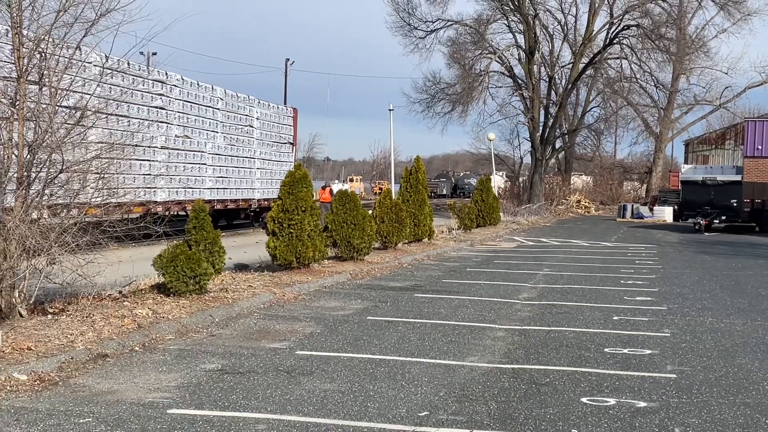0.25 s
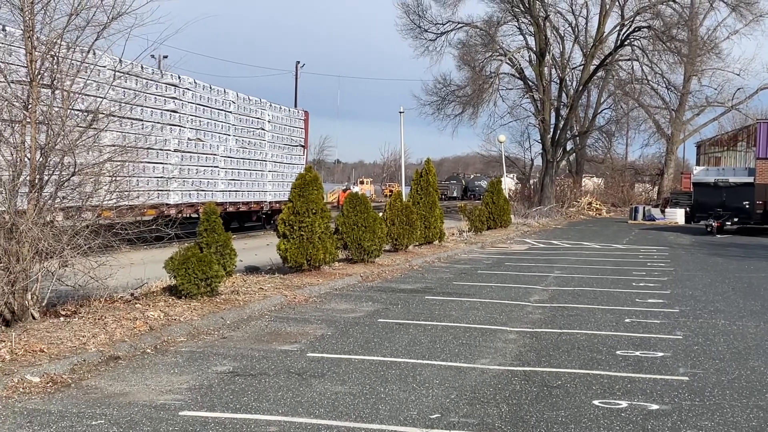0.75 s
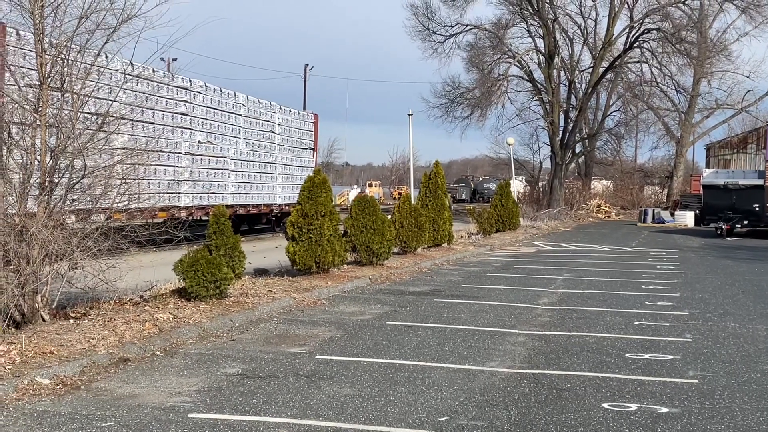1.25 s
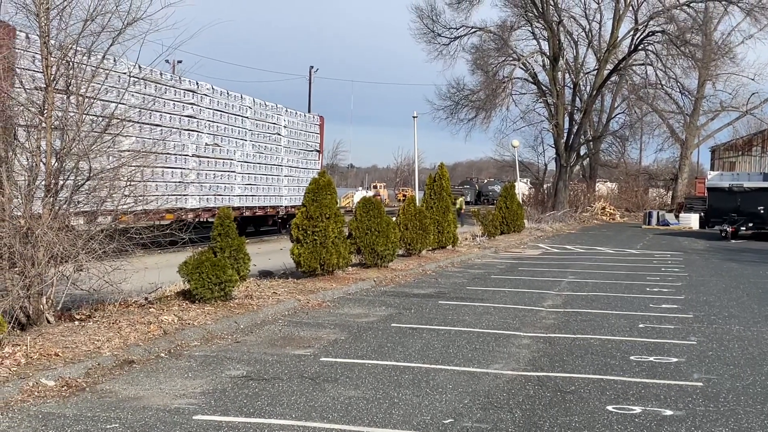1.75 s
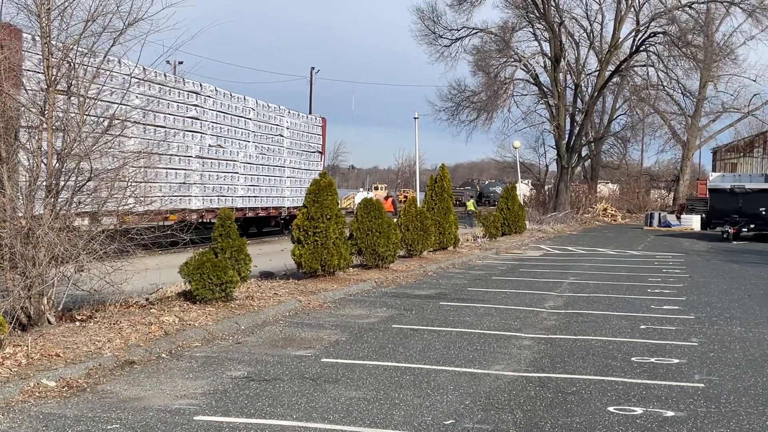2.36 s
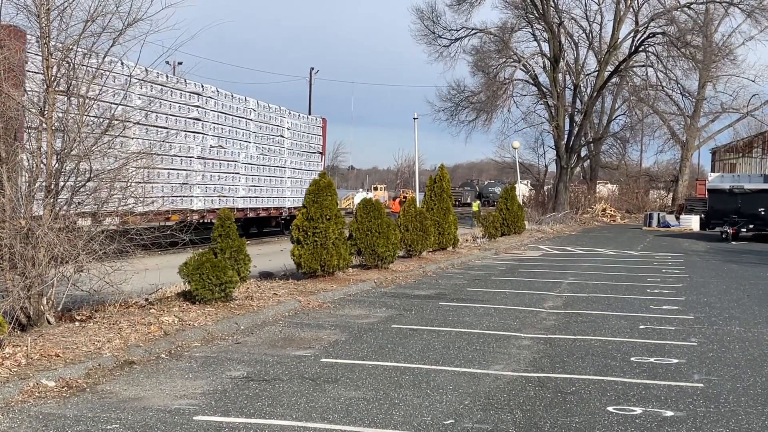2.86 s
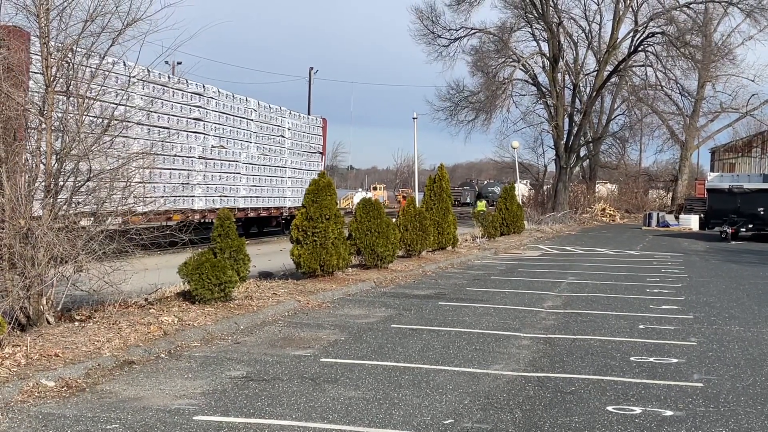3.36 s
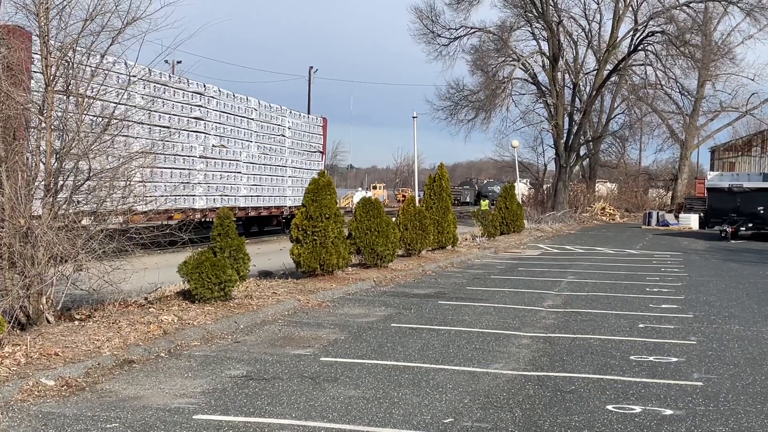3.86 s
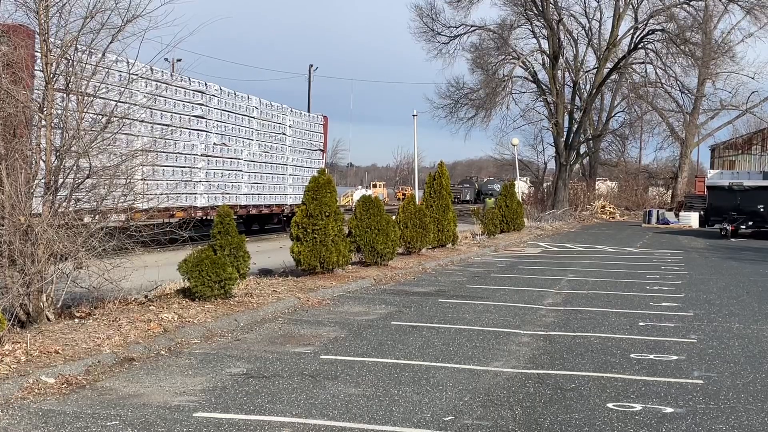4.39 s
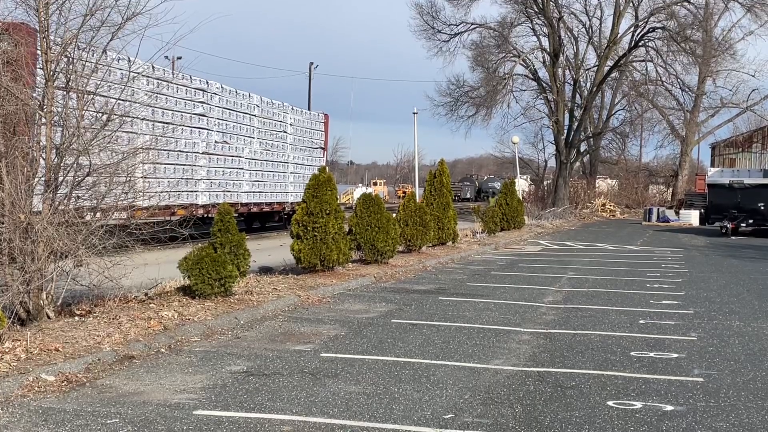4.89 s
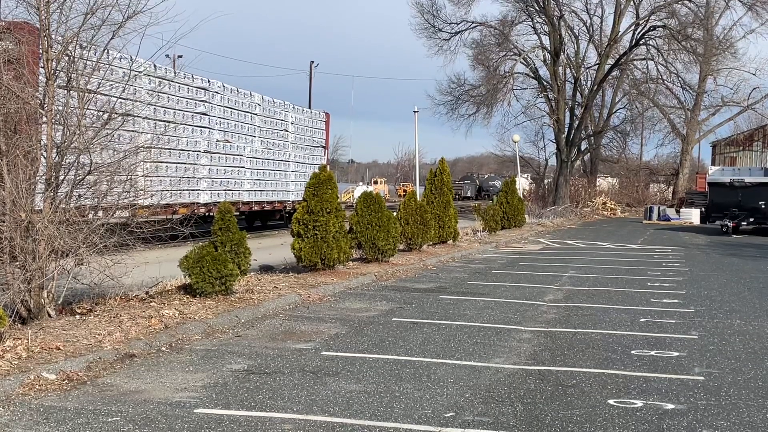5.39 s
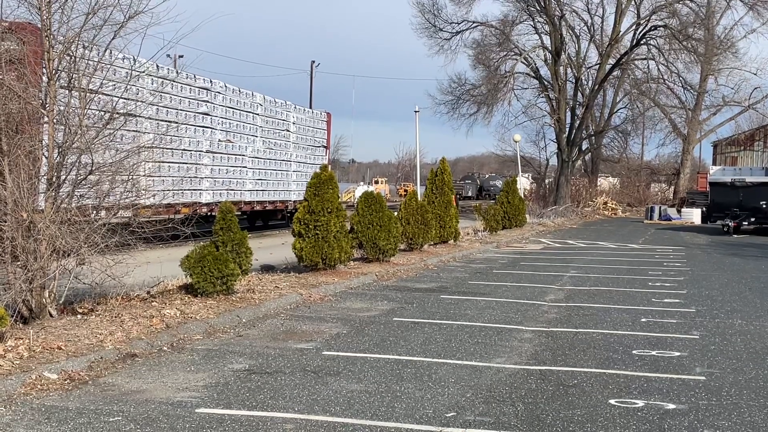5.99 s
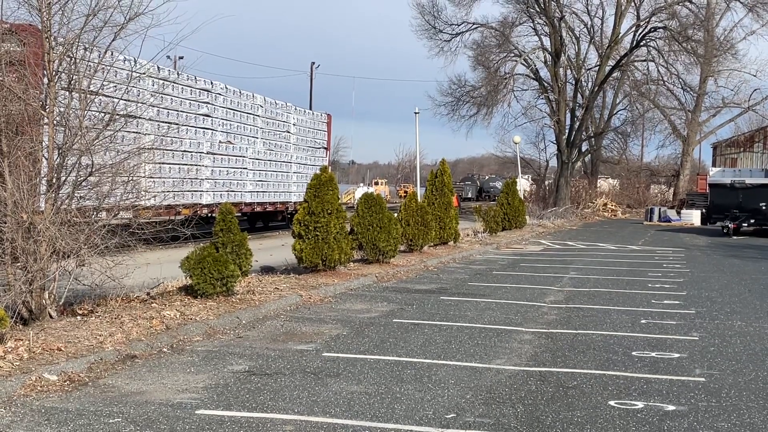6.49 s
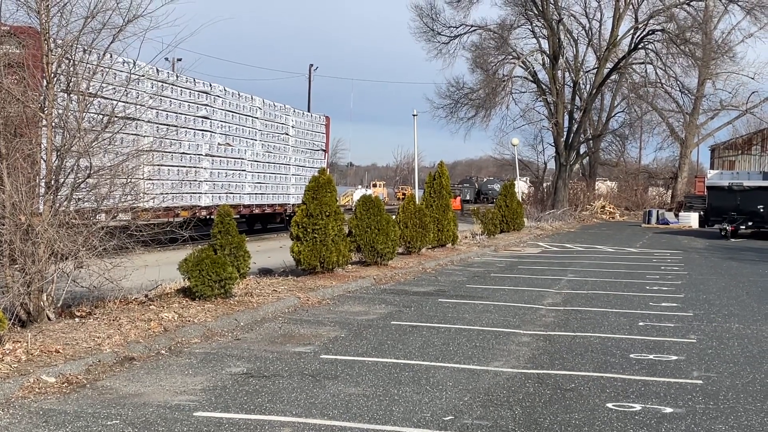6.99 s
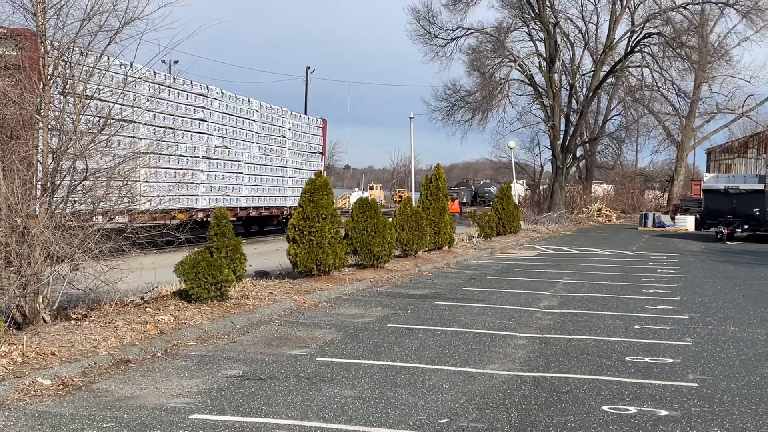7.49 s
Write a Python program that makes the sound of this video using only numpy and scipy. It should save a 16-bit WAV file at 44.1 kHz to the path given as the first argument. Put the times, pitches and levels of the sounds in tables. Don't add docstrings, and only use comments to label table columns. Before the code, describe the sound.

Across an open lot, slow rail cars rumble and tick, bang together heavily twice, squeak and clink, then roll on with scattered clanks.

```python
import sys
import numpy as np
from scipy import signal
from scipy.fft import rfft, irfft, next_fast_len
from scipy.io import wavfile
from scipy.ndimage import uniform_filter1d

SR = 44100
rng = np.random.default_rng(int(sys.argv[2]) if len(sys.argv) > 2 else 0)


def linear_from_db(decibels):
    return 10 ** (np.asarray(decibels, float) / 20)


def materialize(psi):
    bounded = np.clip(np.atleast_2d(psi).T, -1, 1)
    quanta = np.round(bounded * 32767).astype(np.int16)
    wavfile.write(sys.argv[1], SR, quanta)


N = 341334


def evened(x):
    return x / np.sqrt(np.mean(x ** 2) + 1e-20)


def read(points, hz):
    f, value = np.transpose(points)
    return np.interp(np.log(hz + 1), np.log(f + 1), value)


def add(mix, s, sound):
    part = mix[round(s * SR):][:len(sound)]
    part += sound[:len(part)]


def ring(modes, stretch=0.85, shorter=0.96):
    t = np.arange(9000) / SR
    out = np.zeros(9000)
    for hz, db, t60 in modes:
        fade = linear_from_db(db - 60 * t / (min(t60, .25) * shorter))
        out += fade * np.sin(2 * np.pi * hz * stretch * t)
    return out


def resonate(x, hz, width):
    return signal.lfilter(*signal.iirpeak(hz, hz / width, SR), x)


def surges(steady_db, events):
    power, t = linear_from_db(2 * steady_db), np.arange(SR) / SR
    for start, db, rise, t60 in events:
        rise = max(rise, .004)
        fade_db = db - 60 * np.maximum(t - rise, 0) / t60
        add(power, start, np.minimum(t / rise, 1) ** 2 * linear_from_db(2 * fade_db))
    return 10 * np.log10(power)


# t/s, load/dB
LOAD = [(0, -37), (.7, -38.5), (1.2, -41), (1.85, -35), (2.15, -29), (2.5, -32), (2.87, -28), (3.9, -30),
        (4.3, -27.5), (5.1, -24.5), (5.7, -27.5), (6.1, -25), (6.4, -27), (6.65, -32), (7.0, -33.5),
        (7.4, -33.5), (7.74, -33)]
# start/s, jolt level/dB, steel over boom/dB, rise/s, steel t60/s
JOLTS = [(.72, -54, -2.5, 0.13, 9.4), (2.875, -14.5, -16.5, 0.034, 0.69), (3.019, -14, -13.5, 0.015, 0.62),
         (3.163, -18, -19.5, 0.0051, 0.91), (3.26, -13, -15.5, 0.034, 0.89), (3.32, -18.5, -3, 0.047, 0.69),
         (3.47, -17.5, -23.5, 0.034, 0.68), (3.78, -29, -19, 0.0086, 3), (3.95, -31, -13.5, 0.01, 3.5),
         (4.36, -27.5, -12.5, 0.0082, 1), (4.456, -15, -16, 0.048, 0.64), (4.645, -15, -19, 0.049, 1.02),
         (5.24, -37, -16, 0.019, 0.28), (5.97, -41.5, -4, 0.079, 0.62), (6.212, -40.5, -0.5, .008, 0.24),
         (7.06, -33.5, -14.5, 0.021, 1.4), (7.46, -37.5, -8, 0.028, 0.53), (7.57, -32, -16.5, 0.023, 1.1)]
# start/s, level/dB, t60/s
SCUFFS = [(.8, -69, 1.3), (1.1, -70, 7.4), (1.86, -70.5, 7.6), (2.37, -73, 0.37), (2.56, -69, 12),
          (3.77, -72, 0.42), (3.96, -84, 0.31), (4.27, -70, .9), (5.37, -70, 2.9), (5.76, -65, 0.71),
          (6.59, -64, 0.13), (7.06, -70, 0.77), (7.22, -68, 0.29), (7.47, -66, 0.47), (7.712, -67, .5)]
BOOM_LAG_S, BOOM_T60_S, THRUM_T60_S = 0.014, 1.23, 1.9
STEEL_DB, STEEL_SHARE = -50.5, 0.9
GRIT_DB, GRIT_SHARE = -73.5, 1.255
THRUM_DB, THRUM_DB_PER_S, THRUM_JOLT_DB = -28, 0.9, -4


def levels():
    t = np.arange(N) / SR
    load_db = np.interp(t, *np.transpose(LOAD))
    thrum_jolts, boom_jolts, steel_jolts = [], [], []
    for s, db, over_db, rise, t60 in JOLTS:
        thrum_jolts.append((s, db + THRUM_JOLT_DB, rise + BOOM_LAG_S, THRUM_T60_S))
        boom_jolts.append((s, db, rise + BOOM_LAG_S, BOOM_T60_S))
        steel_jolts.append((s, db + over_db, rise, t60))
    scrapes = [(s, db, 0.018, t60) for s, db, t60 in SCUFFS]
    thrum_db = surges(THRUM_DB + THRUM_DB_PER_S * t, thrum_jolts)
    boom_db = surges(load_db, boom_jolts)
    steel_db = surges(STEEL_DB + STEEL_SHARE * (load_db + 32), steel_jolts)
    grit_db = surges(GRIT_DB + GRIT_SHARE * (steel_db + 48), scrapes)
    return thrum_db, boom_db, steel_db, grit_db


def wash(calm, crash, level_db, size, patchy_db, streak_db, flicker_db):
    hop = size // 4
    frames, hz = N // hop + 5, np.fft.rfftfreq(size, 1 / SR)
    re, im = rng.standard_normal((2, 2, len(hz), frames))
    a, b = rng.standard_normal((2, len(hz), frames))
    patches = evened(uniform_filter1d(uniform_filter1d(a, size=8, axis=0), size=10, axis=1))
    streaks = evened(uniform_filter1d(uniform_filter1d(b, size=2, axis=0), size=24, axis=1))
    flicker = evened(uniform_filter1d(rng.standard_normal(frames), size=4))
    force = np.clip((level_db - level_db.min()) / np.ptp(level_db), 0, 1)
    force = force[np.minimum(np.arange(frames) * hop, N - 1)]
    colour = linear_from_db(read(calm, hz)[:, None] * (1 - force) + read(crash, hz)[:, None] * force)
    colour /= np.sqrt((colour ** 2).mean(0))
    unrest_db = patchy_db * patches + streak_db * streaks + flicker_db * flicker
    z = (re + 1j * im) * colour * linear_from_db(unrest_db)
    noise = signal.istft(z, nperseg=size, noverlap=size - hop)[1][:, :N]
    return linear_from_db(level_db) * evened(noise)


# f/Hz, level/dB per Hz
BOOM_CALM = [(59, -63), (100, -4.5), (172, -5), (274, -15), (368, -15.5), (436, -17), (523, -20),
             (613, -23.5), (1020, -26.5), (1500, -35), (1950, -24.5), (3300, -120)]
BOOM_CRASH = [(59, -47), (100, -1), (277, -8), (408, -12), (541, -14.5), (592, -13.5), (671, -17),
              (1070, -22.5), (1130, -29), (1340, -27), (1500, -24.5), (1950, -51), (3300, -120)]


def boom(level_db):
    return wash(BOOM_CALM, BOOM_CRASH, level_db - 1.5, 1024, patchy_db=1.0, streak_db=2.5, flicker_db=-0.23)


# f/Hz, level/dB per Hz
STEEL_CALM = [(800, -61), (1150, 1), (1480, -3), (1700, -0.5), (2300, 3.5), (2800, 0), (3300, -2.5),
              (5800, -14.5), (7000, -21), (9100, -46), (15000, -120)]
STEEL_CRASH = [(650, -59), (1100, 3), (1390, -11.5), (2440, -3), (3460, -8), (3920, -12), (4830, -10),
               (5300, -30.5), (7000, -19), (9100, -38), (15400, -120)]


def steel(level_db):
    return wash(STEEL_CALM, STEEL_CRASH, level_db - 0.1, 512, patchy_db=0.5, streak_db=3.5, flicker_db=0.76)


# f/Hz, width/Hz, level/dB
FRAME = [(1870, 250, 8), (2040, 37, -7), (2363, 59, 5), (2520, 50, 5), (2800, 34, 4), (2950, 52, -1),
         (3190, 37, 0.5), (3830, 60, 6.5), (4100, 29, 3.5), (4485, 30, 0), (5190, 64, -10),
         (5360, 42, -1.5), (6050, 34, -4), (6680, 67, 0.5)]


def rattle(level_db, per_s=1500, spread_db=2.5):
    strength_db = spread_db * np.minimum(rng.exponential(1, N), 4)
    taps = linear_from_db(strength_db) * (rng.random(N) < per_s / SR)
    modes = FRAME + FRAME
    which, out = rng.integers(0, len(modes), N), np.zeros(N)
    for k, (hz, width, db) in enumerate(modes):
        tone = ring([(hz, db, 2.0 / width)], rng.uniform(0.94, 1.005), 1.0)
        out += signal.oaconvolve(taps * (which == k), tone)[:N]
    return evened(out) * linear_from_db(level_db + .35 * (level_db - level_db.max()) - 1.5)


# t/s,
# peak level/dB, note f/Hz, t60/s
THUDS = [(1.521, -22, 388, 0.62), (1.743, -20.5, 317, 0.99), (2.903, -3, 665, 0.11), (2.929, -2, 656, 0.23),
         (3.035, 1, 286, 0.26), (3.063, -0.5, 260, 0.17), (3.269, -2, 533, 0.4), (3.298, -7, 184, 0.19),
         (4.555, -12, 225, 0.2), (4.661, -6, 208, 0.23), (4.878, -13.5, 624, 0.12), (2.6, -22, 270, 0.8),
         (4.495, -8, 342, 0.25), (6.8, -14.5, 147, 0.35), (4.688, -7, 565, 0.3), (4.717, -18, 217, 0.37),
         (5.14, -20.5, 194, 0.69), (1.023, -31, 790, 0.16), (4.499, -16, 914, 0.48),
         (4.549, -39, 1050, 0.23), (4.699, -10.5, 726, 0.2), (7.072, -24, 855, 0.16), (7.3, -21.5, 118, 1),
         (7.501, -41, 1385, 4.8)]


def thuds():
    out, t = np.zeros(N), np.arange(12000) / SR
    for s, db, hz, t60 in THUDS:
        n = rng.standard_normal(12000)
        shake = evened(resonate(resonate(n, hz, 160), hz, 260))
        add(out, s - .005, linear_from_db(db - 13.0 - 60 * t / t60) * shake * np.minimum(t / 0.0054, 1))
    return out


# t/s, peak level/dB, low knock f/Hz, high knock f/Hz, brightness/dB
BLOWS = [(2.2592, -23.5, 2930, 5060, -12.5), (2.8791, -16, 2330, 5650, -9), (2.9086, -11, 1985, 4440, -19),
         (3.025, -14.5, 2087, 5120, -9), (3.0792, -11, 1760, 4700, -7.5),
         (3.1682, -11.5, 1856, 6860, -11.5), (3.2704, -23.5, 2100, 5260, -9),
         (3.293, -22.5, 2940, 3690, -13), (3.405, -20, 2350, 4000, 2.5), (4.716, -19, 2920, 3590, -6),
         (3.335, -16, 2520, 4100, 1), (3.3565, -19, 2860, 5190, -8), (3.379, -20, 3220, 3940, 1),
         (3.477, -13, 1977, 5130, -10), (3.2955, -19, 2880, 3870, -12), (4.4255, -33.5, 2940, 3640, -8),
         (4.4707, -30, 2620, 5000, -11), (4.658, -37, 1870, 3540, -8), (4.6725, -26.5, 2500, 3850, -10),
         (4.684, -25, 2640, 4800, -9), (4.482, -24, 2410, 4980, -18), (4.508, -25.5, 2520, 6050, -1.5),
         (4.701, -17, 2640, 4800, -9.5), (5.9728, -23.5, 1980, 3230, -14.5), (6.038, -17, 2040, 6900, -16),
         (6.0834, -26.5, 1870, 6700, -9), (6.0949, -17.5, 1876, 4430, -12), (6.103, -27, 2900, 4200, -16),
         (6.2171, -16.5, 2036, 4800, -10)]
# t/s, peak level/dB, low knock f/Hz, brightness/dB
TAPS = [(.188, -34.5, 1624, -31), (.4376, -35, 1675, -31), (.473, -33.5, 1604, -18),
        (0.709, -33.5, 1550, -21.5), (.7856, -34.5, 2630, -18.5), (1.216, -28.5, 3160, -11.5),
        (1.81, -31.5, 2525, -23), (1.991, -33.5, 2260, -19), (2.055, -31, 2040, -30),
        (6.127, -29, 2630, -14), (3.783, -32.5, 2640, -8), (.51, -38.5, 2730, -21),
        (3.8747, -26.5, 3370, -31), (3.9603, -30.5, 2980, -17), (6.489, -29.5, 3550, -11),
        (5.189, -35, 2320, -0.5), (5.2709, -27, 1520, -15.5), (6.3674, -35.5, 2520, -3.5),
        (7.07, -39, 1910, -3), (6.017, -27, 1690, -24), (7.6992, -30.5, 1560, -12.5)]
BLOW_TONE, TAP_TONE, TAP_HIGH_HZ = .47, .35, 4250


def clanks():
    out, t = np.zeros(N), np.arange(9000) / SR
    low_band = signal.butter(3, [1600, 3200], "band", fs=SR, output="sos")
    high_band = signal.butter(3, [3200, 7500], "band", fs=SR, output="sos")
    hits = [(*row, BLOW_TONE) for row in BLOWS]
    hits += [(s, db, hz, TAP_HIGH_HZ, bright_db, TAP_TONE) for s, db, hz, bright_db in TAPS]
    for s, db, low_hz, high_hz, bright_db, tone in hits:
        n = rng.standard_normal(9000)
        low = evened(signal.sosfilt(low_band, n))
        high = evened(signal.sosfilt(high_band, n))
        t60 = .13 * linear_from_db(.06 * (db + 30))
        crack = (low + linear_from_db(bright_db + 5) * high) * linear_from_db(-60 * t / t60)
        knock = ring([(low_hz, 0, .055), (1.06 * low_hz, -2, .05), (1.47 * low_hz, -15, .05),
                      (high_hz, bright_db + 4, .05)], 1.)
        blow = .9 * (1 - tone) * crack * np.minimum(t / .0015, 1)
        blow += 2.8 * tone * knock * np.minimum(t / .004, 1)
        add(out, s - .002, linear_from_db(db - 9.0) * blow)
    return out


def unsteady_tones(rows):
    out, t = np.zeros(N), np.arange(N) / SR
    wobble, flutter = uniform_filter1d(rng.standard_normal((2, N)), size=400) * np.sqrt(400)
    flutter = flutter + .15 * evened(uniform_filter1d(flutter, size=5000))
    for start, loudest, end, hz0, hz1, db in rows:
        shake = .45 if hz0 != hz1 else 1
        on = (t >= start) & (t < end)
        hz = np.interp(t[on], [start, end], [hz0, hz1]) * (1 + .0035 * shake * wobble[on])
        turns = np.cumsum(hz) / SR
        swell = np.interp(t[on], [start, loudest, end], [0, 1, 0]) ** .9
        out[on] += linear_from_db(db + 1.5 + 2.6 * shake * flutter[on]) * swell * np.sin(2 * np.pi * turns)
    return out


# start/s, loudest/s, end/s, start f/Hz, end f/Hz, level/dB
SQUEAL = [
    (2.812, 2.89, 2.935, 1848, 1846, -28.5),
    (7.48, 7.66, 8.2, 1048, 1053, -44),
]
# start/s, loudest/s, end/s, f/Hz, level/dB
SQUEAKS = [(3.035, 3.055, 3.16, 4475, -31), (3.025, 3.035, 3.09, 5130, -35), (3.03, 3.08, 3.16, 5356, -34),
           (3.035, 3.07, 3.16, 3050, -29.5), (3.04, 3.1, 3.2, 6830, -40), (3.17, 3.2, 3.225, 4350, -43),
           (3.36, 3.385, 3.42, 4100, -29), (3.33, 3.345, 3.42, 3800, -31), (3.42, 3.445, 3.5, 3795, -27),
           (3.33, 3.345, 3.4, 5190, -33), (3.38, 3.41, 3.45, 2400, -29), (2.878, 2.885, 2.93, 2650, -35),
           (3.355, 3.38, 3.44, 9680, -43), (3.91, 3.93, 3.95, 4000, -44), (4.405, 4.43, 4.46, 3790, -39),
           (4.495, 4.52, 4.57, 6050, -40), (4.5, 4.53, 4.575, 2520, -37), (4.52, 4.53, 4.55, 3900, -41),
           (4.69, 4.71, 4.76, 6680, -46), (4.69, 4.72, 4.78, 2560, -37), (4.76, 4.77, 4.8, 4900, -46),
           (4.925, 4.935, 4.975, 3760, -45), (6.07, 6.09, 6.2, 6780, -54), (6.09, 6.105, 6.17, 5350, -49),
           (6.085, 6.1, 6.15, 4500, -51), (6.11, 6.125, 6.15, 2800, -46), (6.215, 6.225, 6.27, 2950, -42),
           (5.975, 5.99, 6.005, 3350, -47), (6.085, 6.105, 6.21, 1870, -42),
           (6.215, 6.235, 6.27, 7040, -45), (6.485, 6.5, 6.545, 3540, -43), (4.09, 4.125, 4.14, 3500, -46),
           (4.17, 4.185, 4.2, 4000, -48), (5.35, 5.42, 5.46, 3950, -50), (5.665, 5.68, 5.7, 3500, -49),
           (2.257, 2.27, 2.38, 5240, -50), (2.257, 2.27, 2.33, 5030, -52), (2.385, 2.392, 2.42, 4650, -53)]
# start/s, loudest/s, end/s, f/Hz, level/dB
RINGS = [(2.95, 2.97, 3.2, 2200, -33), (4.655, 4.677, 4.73, 206, -19), (4.498, 4.52, 4.63, 350.4, -24.5),
         (2.9, 2.927, 2.98, 660, -23.5), (3.265, 3.292, 3.37, 560.3, -21), (3.03, 3.06, 3.1, 280, -18.5),
         (6.15, 6.17, 6.2, 1882, -46), (6.11, 6.13, 6.15, 5360, -52), (3.02, 3.025, 3, 5900, -29.5),
         (3.03, 3.04, 2.9, 6750, -43), (3.035, 3.06, 2.8, 2700, -31), (3.035, 3.068, 3.07, 1790, -26.5),
         (3.335, 3.37, 3.25, 3150, -26), (3.335, 3.36, 3.4, 4500, -26), (3.345, 3.36, 3.45, 5900, -35),
         (3.465, 3.478, 3.56, 2050, -33.5), (3.47, 3.488, 3.64, 3000, -41), (4.465, 4.49, 4.4, 2570, -38),
         (4.49, 4.5, 4.8, 920, -35), (4.69, 4.698, 4.73, 1220, -30), (4.69, 4.705, 4.77, 560, -27.5),
         (4.7, 4.71, 4.8, 2950, -37), (6.036, 6.047, 6.085, 6900, -54), (6.036, 6.045, 5.8, 3050, -41),
         (6.036, 6.038, 6.2, 4650, -46), (6.115, 6.13, 6.15, 2650, -44), (.18, 0.184, .24, 2750, -56),
         (.43, .5, 0.82, 2750, -61), (.43, .5, .56, 1650, -54), (.7, .715, .76, 1680, -52),
         (.7, .715, .76, 2800, -56), (.78, .795, 0.69, 1650, -54), (1.21, 1.225, 1.3, 2980, -54),
         (2.257, 2.273, 2.3, 2370, -47.5)]


def squeaks():
    held = [(a, b, c, hz, hz, db) for a, b, c, hz, db in SQUEAKS + RINGS]
    return unsteady_tones(SQUEAL + held)


# t/s, peak level/dB, f/Hz
CLINKS = [
    (1.851, -33, 1950),
    (4.3635, -28, 1950),
    (4.3687, -22, 2026),
    (4.9125, -22, 2040),
]
# ratio to f, level/dB, t60/s
PIN = [(1, 6, 0.033), (1.07, -2.5, 0.043), (2.35, -22, .04), (2.8, -23, .05), (3.42, -16, 0.042)]


def clinks():
    out, t = np.zeros(N), np.arange(9000) / SR
    for s, db, hz in CLINKS:
        add(out, s, linear_from_db(db - 0.5) * ring(PIN, hz, 0.87) * np.minimum(t / 0.0039, 1))
    return out


# t/s, level/dB
LINKS = [(1.868, -60.5), (1.909, -58), (1.95, -66), (2.015, -54), (2.068, -56), (2.098, -56.5), (2.14, -61),
         (2.198, -59), (2.274, -58.5), (2.562, -63), (2.669, -59), (2.774, -59)]
# f/Hz, level/dB, t60/s
LINK = [(9400, 11, .05), (9800, 9, 0.08), (10300, 5.5, 0.16), (10600, 3.5, 0.12), (10750, -2, .05)]


def chain():
    out, t = np.zeros(N), np.arange(9000) / SR
    for s, db in LINKS:
        a = rng.random()
        sway_hz = 170 * np.sin(2 * np.pi * (a + (30 + 50 * a) * t + 700 * t ** 2))
        slide = np.cos(2 * np.pi * np.cumsum(sway_hz) / SR)
        add(out, s, linear_from_db(db + 0.5) * slide * ring(LINK, 0.966 + .03 * a) * np.minimum(t / 0.0099, 1))
    return out


# f/Hz, level/dB per Hz
GRIT = [(3200, -13), (5000, 6.5), (6800, 1), (8300, 1.5), (10000, -3.5), (12000, -9.5), (14000, -11.5),
        (15800, -11), (16500, -61)]


def grit(level_db):
    return wash(GRIT, GRIT, level_db + 11, 512, patchy_db=1.0, streak_db=2.5, flicker_db=1.8)


# f/Hz, level/dB per Hz
THRUM = [(12, -53), (20, -65), (43, -30), (51, 6), (65, 7), (85, 4), (108, -9.5), (139, -57), (160, -28),
         (210, -48), (350, -120)]


def thrum(level_db):
    return wash(THRUM, THRUM, level_db, 2048, patchy_db=0.0, streak_db=-1.5, flicker_db=-1.77)


# start/s, loudest/s, end/s, start f/Hz, end f/Hz, level/dB
WHINE = [
    (-6, 1, 5, 733, 381, -50.5),
    (-4, 2.6, 3.2, 1340, 876, -62),
]


def whine():
    return unsteady_tones(WHINE)


# f/Hz, t60/s
LOT = [(100, 0.94), (1000, 0.8), (1800, 0.28), (4000, 0.2), (12000, 0.21)]


def echoes(x):
    taps = np.zeros((2, SR))
    at = np.arange(400, SR - 20, 20) + rng.integers(0, 20, (2, (SR - 401) // 20))
    np.put_along_axis(taps, at, rng.choice([-1., 1.], at.shape), 1)
    hz, t, z = signal.stft(taps, SR, nperseg=256)
    tail = signal.istft(z * linear_from_db(-60 * t / read(LOT, hz)[:, None]), SR, nperseg=256)[1]
    return signal.fftconvolve(x[None], tail / np.linalg.norm(tail[0]), axes=1)[:, :N]


def scene():
    thrum_db, boom_db, steel_db, grit_db = levels()
    parts = rattle(steel_db) + thuds() + clanks() + squeaks() + clinks() + chain() + whine()
    washes = boom(boom_db) + steel(steel_db) + grit(grit_db) + thrum(thrum_db)
    direct = parts * linear_from_db([[-.4], [-6.]])
    reflected = linear_from_db([[-12.], [-3.]]) * echoes(parts)
    return washes + direct + reflected


# f/Hz, likeness 0-1
LIKE = [(60, .995), (260, .96), (600, .85), (1000, .72), (1300, .4), (1800, .62), (2200, .93), (6000, .97),
        (7300, .9), (9500, .82), (13000, .75)]
# f/Hz, phase/radians
LEAD = [(40, 0), (260, -.55), (500, -.85), (800, -1.05), (1250, -.4), (1480, .5), (2100, .1), (5900, .1),
        (6450, .6), (7300, 1.45), (8300, 3.14), (9500, 4.7), (10800, 6.1), (12000, 6.4), (14400, 9.4)]
# f/Hz, level/dB
TILT = [(60, .3), (130, .8), (280, .2), (610, 2.4), (1330, 2.6), (1900, 2.6), (2400, .3), (13600, .1)]
# from f/Hz, to f/Hz
ONLY_SUM = [(2450, 6250), (10600, 12700)]
ONLY_DIFFERENCE = [(7720, 8800), (14150, 22050)]


def two_ports(dry):
    size = next_fast_len(N + 4096)
    hz, (track, field) = np.fft.rfftfreq(size, 1 / SR), rfft(dry, size)
    like = np.clip(read(LIKE, hz), 0, 1)
    half = np.exp(.5j * read(LEAD, hz)) * linear_from_db(-read(TILT, hz) / 2)
    left = track / half
    right = (like * track + np.sqrt(1 - like ** 2) * field) * half
    total = (left + right) / 2 * (1 - sum((hz > a) & (hz < b) for a, b in ONLY_DIFFERENCE))
    difference = (left - right) / 2 * (1 - sum((hz > a) & (hz < b) for a, b in ONLY_SUM))
    low_cut = hz ** 2 / np.sqrt(hz ** 4 + 44.8 ** 4)
    return irfft(np.array([total + difference, total - difference]) * low_cut, size)[:, :N]


def band_limit(x):
    return signal.sosfilt(signal.butter(12, 15790, fs=SR, output="sos"), x)


def record(dry):
    limited = 1.1 * np.tanh(two_ports(dry) / 1.07)
    return band_limit(limited)


dry = scene()
out = record(dry)
materialize(out)
```